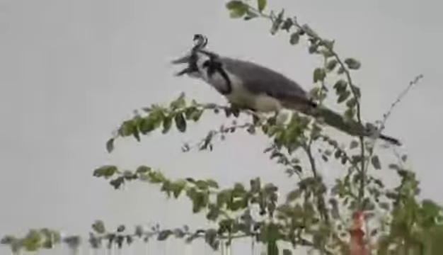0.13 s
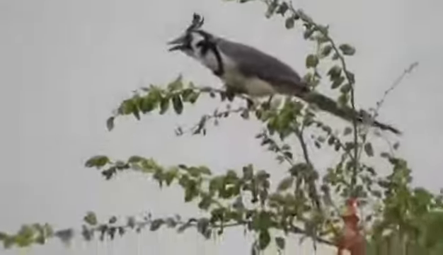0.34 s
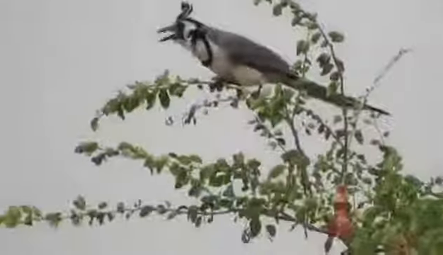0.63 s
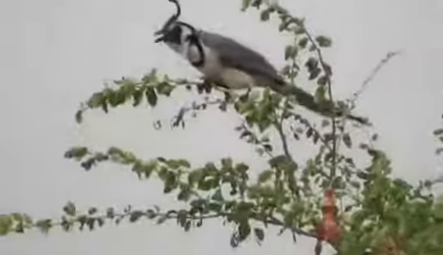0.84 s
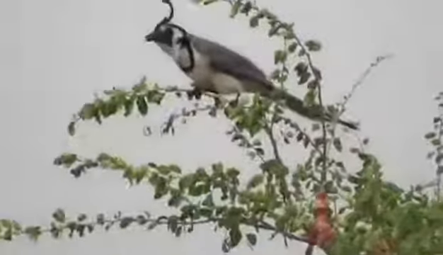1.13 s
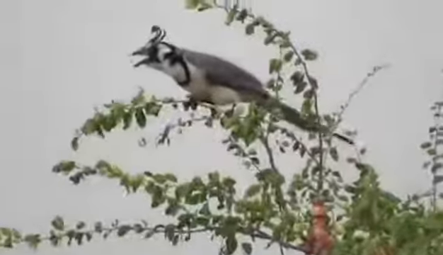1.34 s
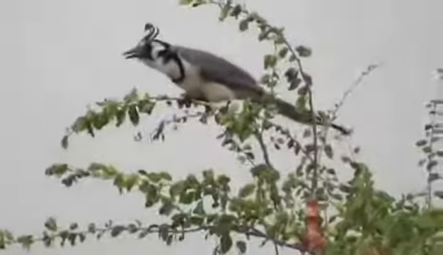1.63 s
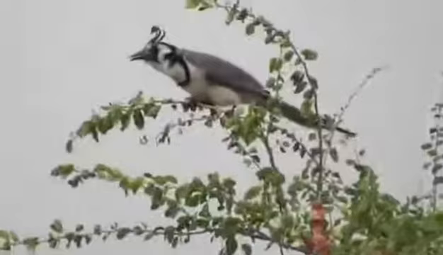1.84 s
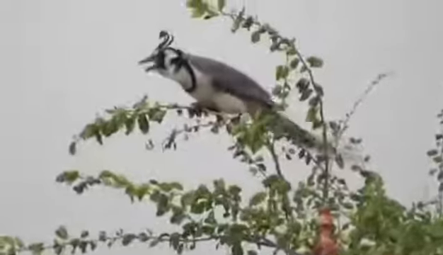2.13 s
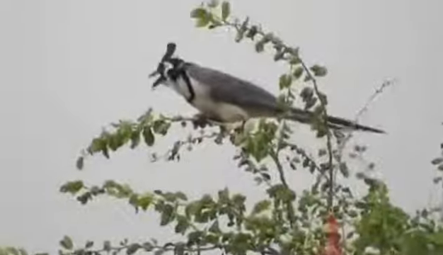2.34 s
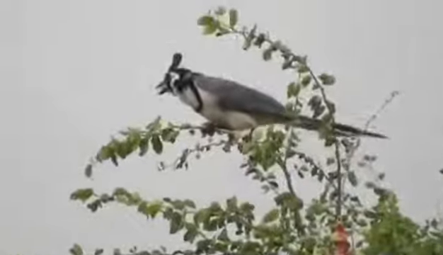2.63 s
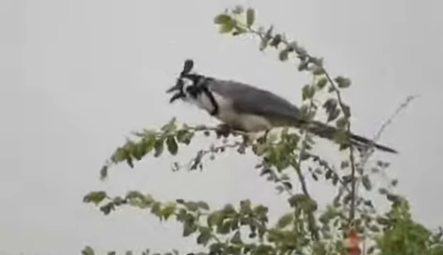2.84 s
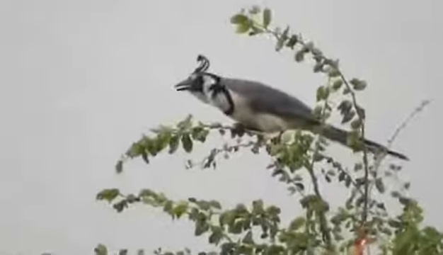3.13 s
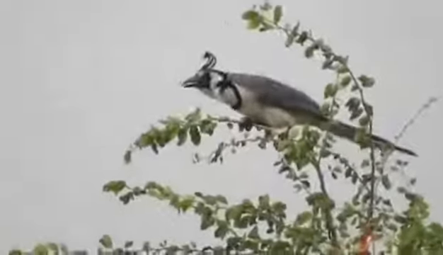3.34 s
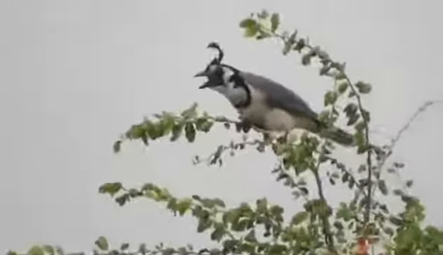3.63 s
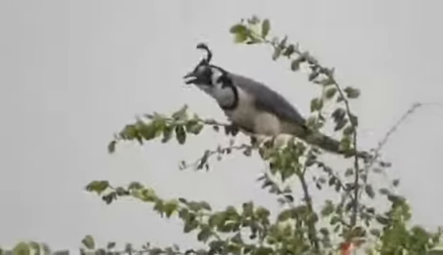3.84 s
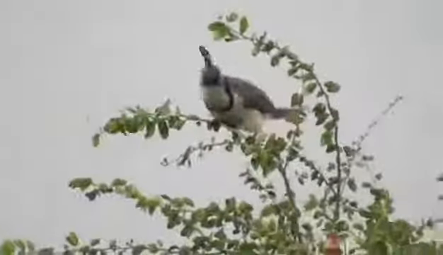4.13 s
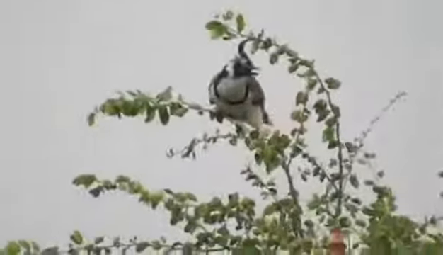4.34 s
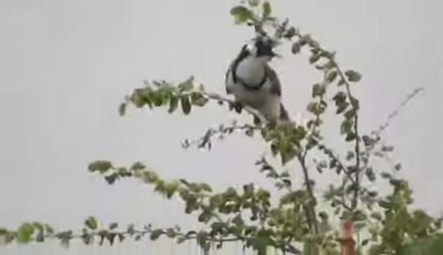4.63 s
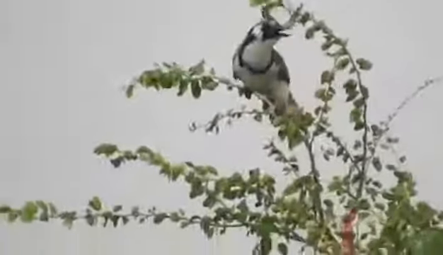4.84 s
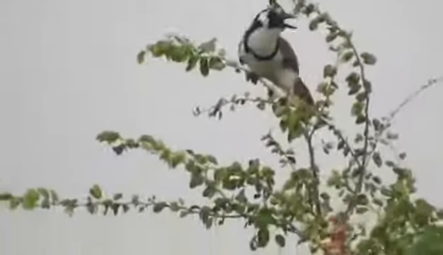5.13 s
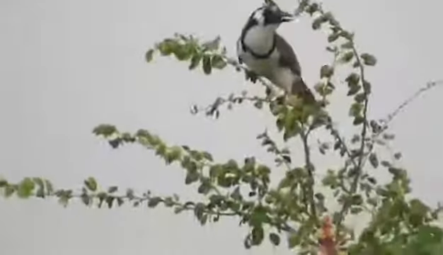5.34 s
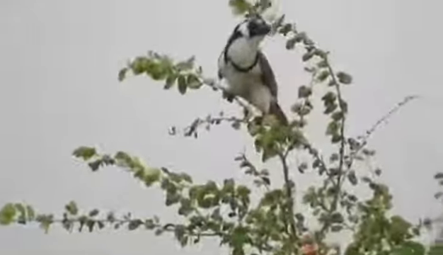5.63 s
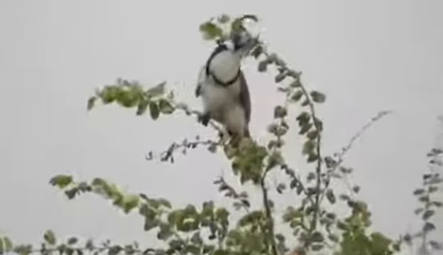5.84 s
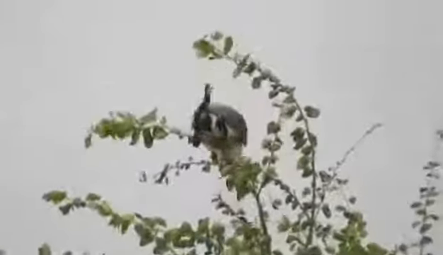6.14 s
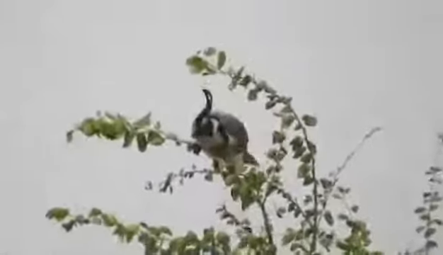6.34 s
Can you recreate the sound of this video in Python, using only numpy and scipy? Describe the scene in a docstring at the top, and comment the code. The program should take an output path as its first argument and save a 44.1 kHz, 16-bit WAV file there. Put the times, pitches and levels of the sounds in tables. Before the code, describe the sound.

Outdoors, a bird squawks about every half second to a second, with a raspy, arching, whistled tone. Behind it are a faint distant hum and a thin, high insect hiss, with two soft hoots early on. Midway, wind begins to buffet the microphone in low, uneven thumps. The background then drops away and the bird's calls grow quieter and less harsh.

```python
"""A harsh, buzzing bird call opens the scene: a magpie-jay on a bush top, ten calls in all. Each is an
arching whistle chopped into pulses, with air rasping in the throat and a faint echo off the land.
Behind it a hollow drone lies far off and insects hiss high up; both sink after four seconds.
Two soft hoots pass early, and a thin whine swells for about a second near the middle.
The air is nearly calm at first; from halfway on, gusts of wind buffet and thump the microphone."""
import sys
import numpy as np
from scipy import signal
from scipy.fft import rfft, irfft, next_fast_len
from scipy.io import wavfile
from scipy.ndimage import uniform_filter1d, map_coordinates

SR = 44100
rng = np.random.default_rng(int(sys.argv[2]) if len(sys.argv) > 2 else 0)


def log_audio(samples):
    """Write samples as a 16-bit WAV file to the path given in sys.argv[1]."""
    # one column per channel
    frames = np.atleast_2d(samples).T
    # limit to full scale, then quantise
    limited = np.clip(frames, -1, 1)
    pcm = np.round(limited * 32767).astype(np.int16)
    wavfile.write(sys.argv[1], SR, pcm)


N = 286650
TIME = np.arange(N) / SR


def amp(db):
    """Decibels to gain."""
    return 10 ** (np.asarray(db) / 20)

def unit(x):
    """Scale to rms 1."""
    return x / np.sqrt(np.mean(x ** 2) + 1e-20)

def even(pulses):
    """Scale pulse shapes to a running rms of 1."""
    return pulses / np.sqrt(uniform_filter1d(pulses ** 2, size=1400))

def along(points, hz):
    """Read (f/Hz, value) breakpoints on a log frequency axis."""
    f, values = np.transpose(points)
    return np.interp(np.log(hz + 1), np.log(f + 1), values)

def curves(rows, at=TIME):
    """Breakpoints to envelopes, one for each column after the first."""
    knots, *columns = np.transpose(rows)
    return [np.interp(at, knots, column) for column in columns]

def wobble(rate):
    """A smooth random modulator, rate knots a second."""
    return map_coordinates(rng.standard_normal(int(N * rate / SR) + 4), [TIME * rate])

def filtered(x, response):
    """EQ x with a gain given as a function of frequency."""
    size = next_fast_len(N + SR // 2)
    return irfft(rfft(x, size) * response(np.fft.rfftfreq(size, 1 / SR)), size)[:N]

def noise(spectrum):
    """Coloured noise of rms 1."""
    return unit(filtered(rng.standard_normal(N), lambda hz: amp(along(spectrum, hz))))


# The jay's cue list: start t/s, length/s, attack/s, level/dB, top f/Hz, end f/Hz,
# brightness/dB, base buzz rate/Hz, harshness/0-1
JAY_CALLS = [ (-.07, .36, .06, -34.5, 2778, 2322, 2, 118, 0.79),
             (0.426, .29, 0.049, -33.5, 2765, 2306, 1.5, 144, 0.86),
             (1.004, .251, 0.073, -31, 2762, 2327, 1, 142, 0.73),
             (1.587, 0.29, 0.054, -33, 2788, 2312, 0, 140, 0.91),
             (2.51, 0.31, .046, -34.5, 2733, 2279, -0.5, 126, 1),
             (3.033, .277, 0.054, -34.5, 2633, 2346, -2, 141, 0.98),
             (3.892, 0.31, 0.06, -31, 2800, 2317, 2.5, 141, 0.85),
             (4.471, .29, 0.031, -41, 2687, 2367, -1.5, 155, 0.75),
             (5.062, .258, 0.05, -44, 2612, 2470, 0.5, 142, .45),
             (5.551, 0.25, 0.058, -42.5, 2530, 2500, -4, 146, .45)]
def running_call(lead_s=.06):
    """For every sample: the age of the current call, then its other columns."""
    calls = np.array(JAY_CALLS)
    index = np.searchsorted(calls[1:, 0] - lead_s, TIME)
    start, *columns = calls[index].T
    return TIME - start, *columns

def call_envelope(age, length, attack, onset_db=-15.5, release_db=-12.5, release_s=.05):
    """Attack, a hold that sags past the middle, and release, in dB; a fast gate shuts both ends."""
    open_db_per_s, sag_db_per_s, close_db_per_s = 1500, 30.5, 900
    rise = onset_db * (1 - np.clip(age / attack, 0, 1) ** 1.05)
    sag = sag_db_per_s * np.maximum(age - length / 2, 0)
    release = release_db * np.clip(1 - (length - age) / release_s, 0, 1)
    gate = open_db_per_s * np.minimum(age, 0) - close_db_per_s * np.maximum(age - length, 0)
    return rise - sag + release + gate

def pitch_arch(age, progress, top_hz, end_hz, start_hz=1854, climb_hz_per_s=11000, crest=.4):
    """The pitch climbs to its top, holds until the crest (a share of the call), then slides down."""
    climb = start_hz + climb_hz_per_s * np.maximum(age, 0)
    slide = np.clip((progress - crest) / (1 - crest), 0, 1)
    return np.minimum(climb, top_hz + (end_hz - top_hz) * slide)

# Buzz shape through a call, dips at full harshness: progress/0-1, buzz rate/ratio, pitch dip/ratio,
# level dip/dB, rasp/dB, pulse breadth (1 round, 2 flat-topped)
BUZZ_SHAPE = [(0, 1, .55, 22, 9, .8), (.1, 1, .45, 18, 3, 1), (.2, .99, .25, 14, -5, 1.5),
              (.42, .95, .21, 9, -5.5, 2), (.68, .9, .35, 6, -6, 2.1), (1, .83, .35, 6, -2, 2)]
def jay(whistle_db=-.5):
    """Each buzz pulse is a scrap of whistle; between pulses pitch and level dip and air rasps."""
    age, length, attack, call_db, top_hz, end_hz, bright_db, buzz_hz, harsh = running_call()
    progress = np.clip(age / length, 0, 1)
    speed, swing, chop_db, rasp_db, breadth = curves(BUZZ_SHAPE, progress)
    swing, chop_db = harsh * swing, harsh * chop_db
    cycle = 2 * np.pi * np.cumsum(speed * buzz_hz * (1 + .025 * wobble(110))) / SR
    dip = lambda shift: ((1 - np.cos(cycle + shift)) / 2) ** breadth
    # the whistle is steadiest at the top of each pulse
    jitter = (.012 + .035 * dip(0)) * wobble(1500) + (.008 + .05 * swing) * wobble(200)
    bend = .02 - swing * dip(.2) ** 1.3 - .022 * np.sin(cycle) + jitter
    pitch_hz = pitch_arch(age, progress, top_hz, end_hz) * (1 + bend)
    phase = 2 * np.pi * np.cumsum(pitch_hz) / SR
    # three layers, each chopped at its own point in the buzz cycle
    whistle = np.sin(phase) * even(amp(-chop_db * dip(0) + 1.3 * wobble(140) + wobble(900)))
    overtones = torn_overtones(phase) * even(amp(-chop_db * dip(-1.56) + 1.6 * wobble(700)))
    rasp = throat_rasp(call_db) * even(amp(-.7 * chop_db * dip(.6) + .37 * wobble(400)))
    overtone_db = bright_db - 4.5 * (1 - np.sin(np.pi * progress))  # duller at both ends
    tone = amp(whistle_db) * whistle + amp(overtone_db) * overtones
    rasp_gain = amp(overtone_db + rasp_db)
    voice = (np.sqrt(2) * tone + rasp_gain * rasp) / np.hypot(1, rasp_gain)
    return amp(call_db + call_envelope(age, length, attack)) * voice

# Overtones of the whistle: harmonic number, level/dB
OVERTONES = [(2, -5.5), (3, -12), (4, -18.5), (5, -28.5)]
# The open throat, favouring the second partial: f/Hz, gain/dB
THROAT_EQ = [(3000, 3), (3600, -46), (4300, -0.5), (5900, -0.5), (6700, -4), (8500, -8.5), (12000, -2),
             (15000, -3)]
def torn_overtones(phase):
    """Harmonics roughened by extra phase jitter and coloured by the throat."""
    partials = sum(amp(db) * np.sin(k * phase + .35 * k * wobble(1400)) for k, db in OVERTONES)
    return filtered(partials, lambda hz: amp(along(THROAT_EQ, hz)))

# Colour of the rasp: f/Hz, density/dB
RASP_SPECTRUM = [(600, -44), (1100, -11), (1350, 5), (1650, 4), (1900, 3.5), (3000, 10), (3700, 3.5),
                 (4400, 2.5), (5700, 6.5), (6600, -4), (8500, -13), (11000, -14.5), (12200, -69),
                 (15500, -36)]
def throat_rasp(call_db, edge_hz=9500, neutral_db=-37):
    """Air rasps in the throat; a harder push sharpens its top edge."""
    air = noise(RASP_SPECTRUM)
    edge = filtered(air, lambda hz: hz > edge_hz)
    return air - edge + edge * amp(call_db - neutral_db)


# Decay of the open land: f/Hz, t60/s
LAND_DECAY = [(500, 1.0), (2600, 1.3), (5000, .85), (10000, .35)]
# Colour of its echo: f/Hz, gain/dB
ECHO_EQ = [(1200, -5), (2000, -7), (2400, -2), (2750, 0), (3300, -1), (4500, 2), (5600, 2.5), (7000, -4),
           (10000, -12)]
def outdoors(x, trim_db=-1, near_db=-10, far_db=-19.5, near_t60=.1):
    """Twigs and ground scatter the call at once; the land sends back a long faint echo."""
    t = TIME[:SR]
    near_tail = rng.standard_normal(SR) * amp(-60 * t / near_t60) * (t > .002)
    hz, frame_s, spectra = signal.stft(rng.standard_normal(2 * SR), SR, nperseg=256)
    fade = amp(along(ECHO_EQ, hz)[:, None] - 60 * frame_s / along(LAND_DECAY, hz)[:, None])
    far_tail = signal.istft(spectra * fade, SR, nperseg=256)[1]
    sink_db = .45 * (curves(BED_FADER)[0] + 51)  # the far echo partly follows the bed's fall from -51 dB
    echo = lambda tail: signal.fftconvolve(x, tail / np.linalg.norm(tail))[:N]
    return amp(trim_db) * (x + amp(near_db) * echo(near_tail) + amp(far_db + sink_db) * echo(far_tail))


# Shared fader of the distant bed, drone and insects: t/s, level/dB
BED_FADER = [(0.0, -52.5), (0.9, -50.5), (2.82, -51.5), (3.56, -51), (4.11, -50.5), (4.56, -60),
             (5.1, -63.5), (6.5, -62.5)]
# Colour of the drone's wash: f/Hz, density/dB
WASH_SPECTRUM = [(30, 11), (60, 11), (130, -3), (200, -12.5), (260, -1), (310, 1.5), (410, -5.5),
                 (520, 0.5), (660, -1.5), (800, 3), (1000, -2.5), (1150, -8), (2000, -10), (4000, -32)]
# Its hollow resonances: f/Hz, half-width/Hz, level/dB
DRONE_MODES = [(270.7, 38, -9.5), (504, 15, -11), (573.3, 7.9, -3.5), (735.6, 18, 0.5), (961.3, 18, -7)]
def drone(wash_db=3):
    """A distant wash of noise with a few hollow, wavering tones."""
    bed_db, = curves(BED_FADER)
    ring = lambda f: sum(amp(db) / (1 + ((f - hz) / width) ** 2) for hz, width, db in DRONE_MODES)
    tones = unit(filtered(rng.standard_normal(N), ring))
    wash = amp(wash_db + .9 * wobble(7)) * noise(WASH_SPECTRUM)
    return amp(bed_db) * (tones + wash)


# Colour of the insect hiss: f/Hz, density/dB
INSECT_SPECTRUM = [(2000, -24), (4000, -18), (6000, -17), (7000, -15), (7950, -14), (8400, -2), (8750, 0),
                   (9150, -1), (9600, -10), (10000, -22), (11300, -33), (13000, -29), (14300, -33),
                   (15500, -50)]
def insects(trim_db=1.5):
    """A chorus of many small raspers merges into a shimmering high band."""
    bed_db, = curves(BED_FADER)
    shimmer_db = .77 * wobble(200) + .96 * wobble(36)
    return amp(bed_db + trim_db + shimmer_db) * noise(INSECT_SPECTRUM)


def eddies(spectrum, lumps_db):
    """Low turbulence that comes in quick lumps around a steady strength."""
    flow = noise(spectrum)
    steady = flow / np.sqrt(np.abs(uniform_filter1d(flow ** 2, size=4000)) + 1e-6)
    return unit(steady * amp(lumps_db * wobble(35)))

# Wind faders once the calm ends: t/s, buffet level/dB, flutter level/dB
WIND_FADERS = [(3.4, -37.5, -48), (3.49, -41.5, -66), (4.56, -34.5, -40), (5.01, -38.5, -49),
               (5.21, -35.5, -37), (5.58, -37.5, -40), (6.14, -33.5, -34), (6.39, -39, -41),
               (6.5, -43, -80)]
# Colours of the coarse buffet and the finer flutter: f/Hz, density/dB
BUFFET_SPECTRUM = [(10, -2), (25, -13), (60, -2.5), (95, -2), (135, -11.5), (220, -36.5), (400, -103)]
FLUTTER_SPECTRUM = [(60, -22), (110, 2.5), (150, 0), (230, -6.5), (330, -18), (500, -31), (1200, -44),
                    (4000, -84)]
# Gusts riding on the faders: centre t/s, length/s, buffet lift/dB
GUSTS = [(0.185, 0.053, 11), (1.95, 0.08, 4), (3.399, 0.062, 6.5), (3.7, .25, -1), (4.08, 0.051, 4),
         (4.279, .11, 7), (4.52, 0.031, 10), (4.623, 0.091, 8), (4.97, 0.026, 6), (5.049, 0.13, 9),
         (5.205, 0.055, 1), (5.368, 0.11, 6), (5.62, 0.045, 5), (5.829, 0.086, 4), (5.994, 0.1, 6.5),
         (6.238, 0.037, 9)]
# Single big eddies: t/s, peak level/dB, f/Hz
THUMPS = [(.18, -35, 60), (1.936, -33, 42), (3.376, -26, 32), (3.404, -25, 50), (3.555, -27, 50),
          (3.667, -29, 45), (4.173, -24, 60), (4.328, -18.5, 90), (4.522, -18.5, 80), (4.961, -20.5, 70),
          (5.204, -21.5, 75), (5.335, -22, 110), (5.797, -24, 90), (6.23, -20, 100)]
def wind(flutter_trim_db=-4, flutter_growth=1.51):
    """Eddies rumble on the microphone; in a gust the fine ones grow faster than the coarse."""
    calm = (3.345, -59.5, -57.5)  # the faders rest here until the wind rises
    buffet_db, flutter_db = curves([calm, *WIND_FADERS])
    gust_db = sum(db * np.exp(-(2 * (TIME - s) / length) ** 2) for s, length, db in GUSTS)
    flutter_db += flutter_trim_db + flutter_growth * gust_db
    rumble = amp(buffet_db + gust_db) * eddies(BUFFET_SPECTRUM, lumps_db=3)
    rumble += amp(flutter_db) * eddies(FLUTTER_SPECTRUM, lumps_db=3.5)
    for s, db, hz in THUMPS:
        phase = 2 * np.pi * hz * (TIME - s)
        rumble *= 1 - .7 * np.exp(-phase ** 2 / 8)  # a big eddy sweeps the small ones aside
        rumble -= amp(db) * phase * np.exp((1 - phase ** 2) / 2)  # one push, one pull
    return rumble


# Hoot cues: centre t/s, level/dB
HOOTS = [(.352, -35), (.477, -38)]
# Partials of a hoot: f/Hz, level/dB
HOOT_TONES = [(285, -5), (738, -1.5)]
def hoots(width_s=.012):
    """Two short, soft, hollow notes far away."""
    swell = sum(amp(db) * np.exp(-.5 * ((TIME - s) / width_s) ** 2) for s, db in HOOTS)
    tones = sum(amp(db) * np.sin(2 * np.pi * hz * TIME + .25 * wobble(115)) for hz, db in HOOT_TONES)
    return swell * tones


# Transient on the front of the fourth call: t/s, level/dB
CLICKS = [(1.591, -37)]
def throat_click(t60=.0089):
    """A hard first pulse snaps through the throat."""
    snap = sum(amp(db - 60 * np.abs(TIME - s) / t60) * (TIME >= s) for s, db in CLICKS)
    return snap * noise(RASP_SPECTRUM)


def whine(pitch_hz=10313, start_s=3.08, end_s=4.28, start_db=-77, swell_db_per_s=5):
    """A faint, thin, high tone that swells and stops."""
    level_db = start_db + swell_db_per_s * np.clip(TIME - start_s, 0, end_s - start_s)
    gate = uniform_filter1d(1.0 * ((TIME > start_s) & (TIME < end_s)), size=2000)
    envelope = gate * amp(level_db + 1.6 * wobble(14))
    return envelope * np.sin(2 * np.pi * pitch_hz * TIME + .5 * wobble(42))


def scene():
    """Mono mix: the bird and its echo over the distant bed and the wind."""
    bird = outdoors(jay() + throat_click())
    return (bird + drone() + insects() + whine() + hoots() + wind())[None]

def record(dry, top_hz=15650):
    """A brick-wall high cut on the whole mix."""
    return filtered(dry[0], lambda hz: hz < top_hz)[None]


dry = scene()
out = record(dry)
log_audio(out)
```